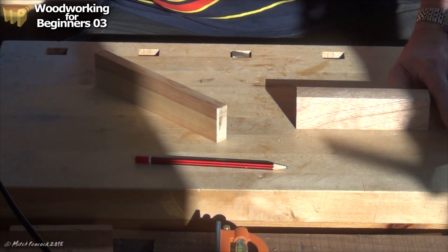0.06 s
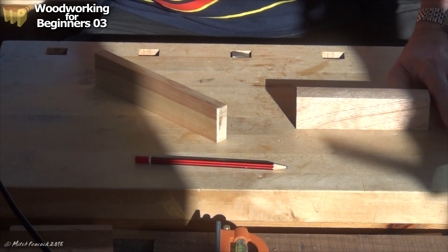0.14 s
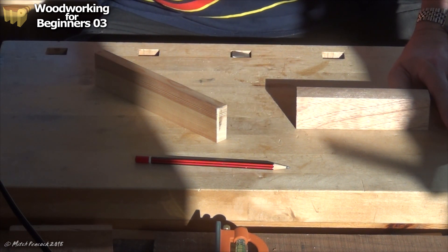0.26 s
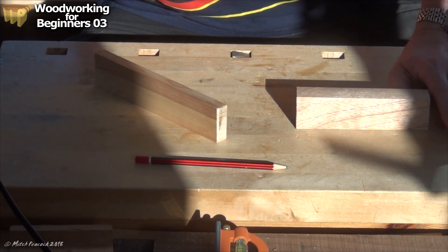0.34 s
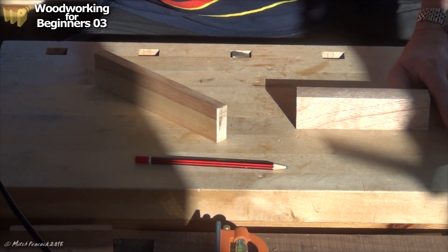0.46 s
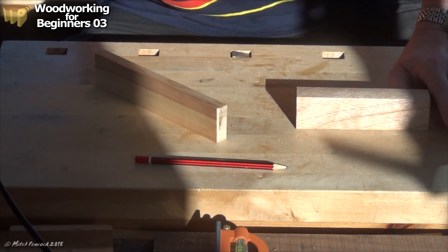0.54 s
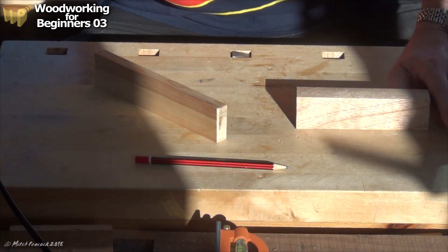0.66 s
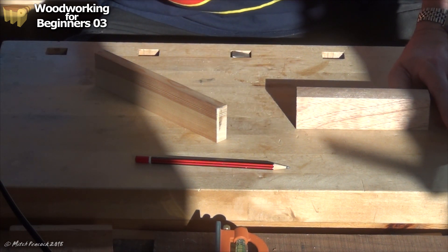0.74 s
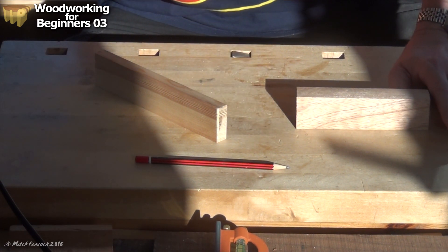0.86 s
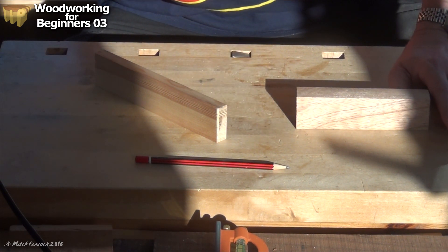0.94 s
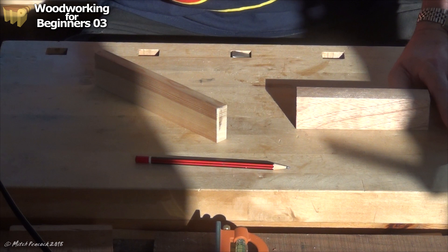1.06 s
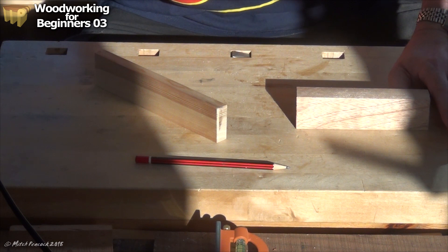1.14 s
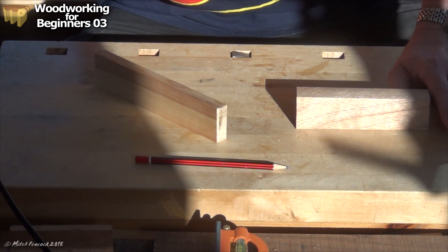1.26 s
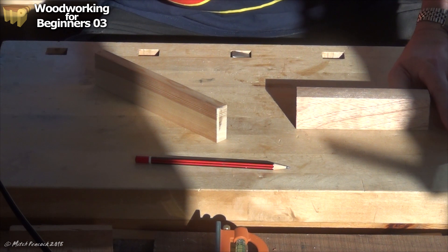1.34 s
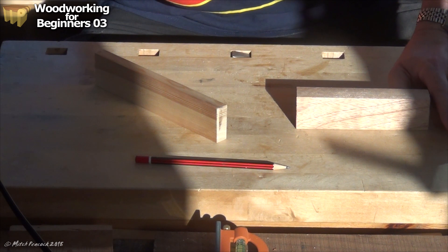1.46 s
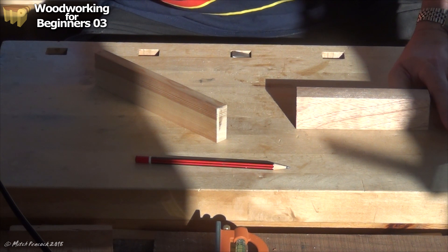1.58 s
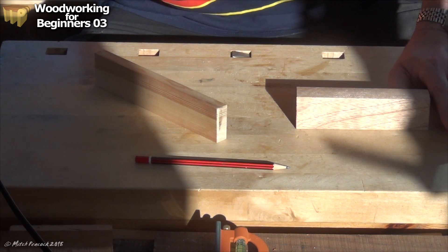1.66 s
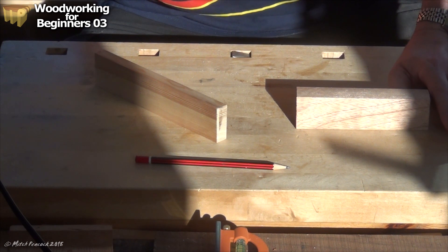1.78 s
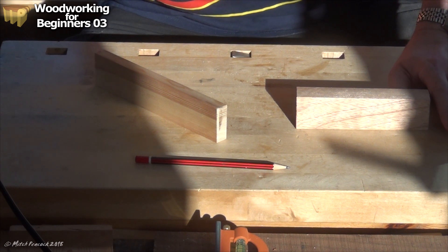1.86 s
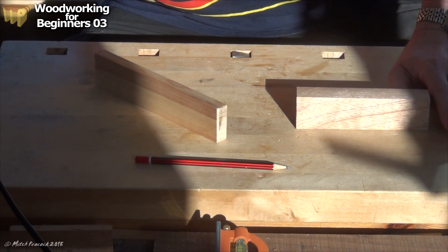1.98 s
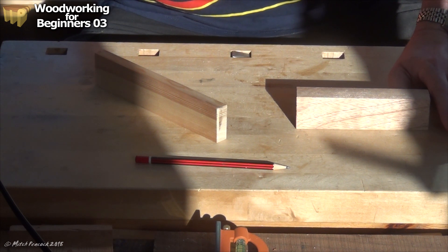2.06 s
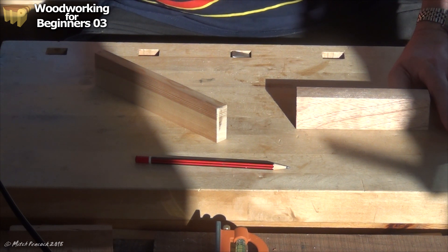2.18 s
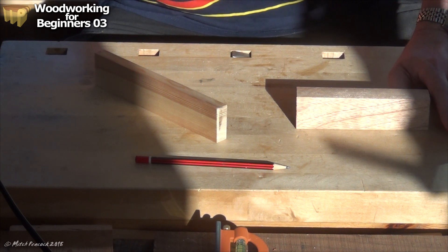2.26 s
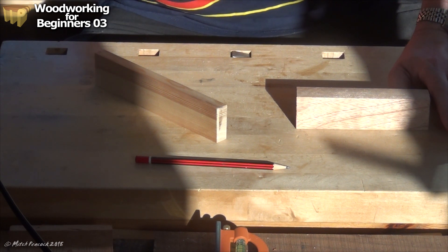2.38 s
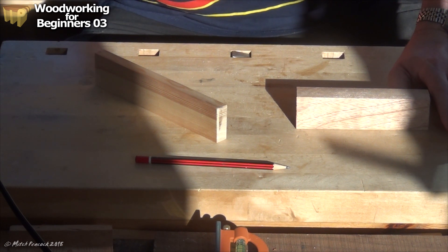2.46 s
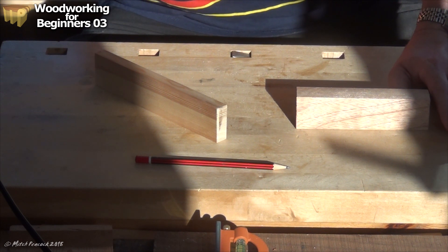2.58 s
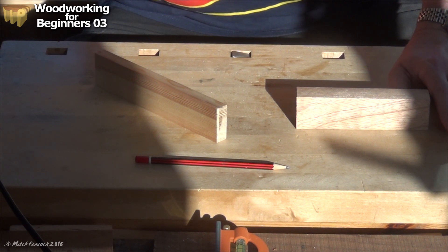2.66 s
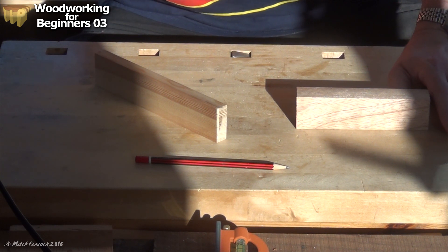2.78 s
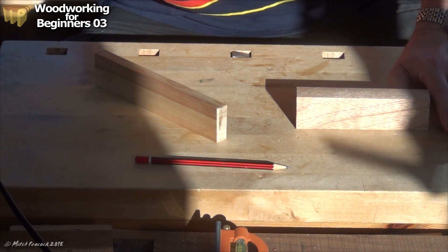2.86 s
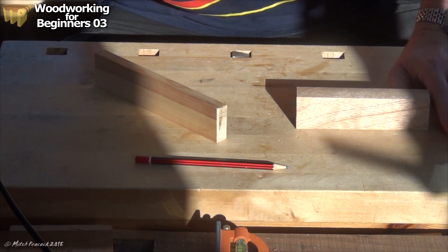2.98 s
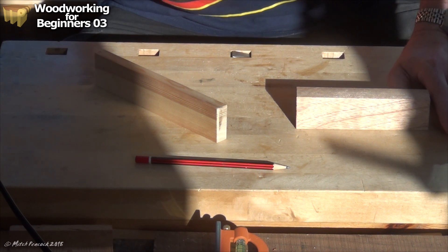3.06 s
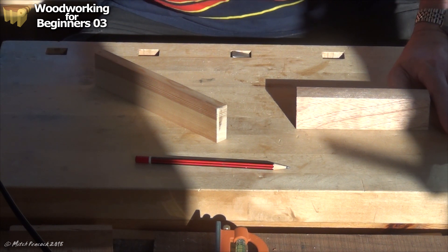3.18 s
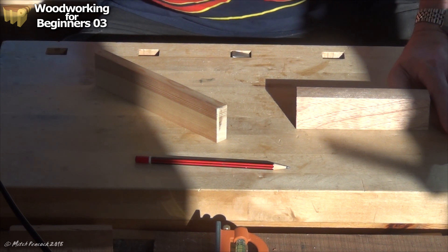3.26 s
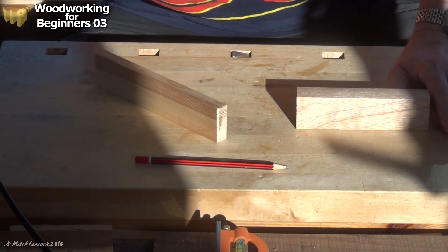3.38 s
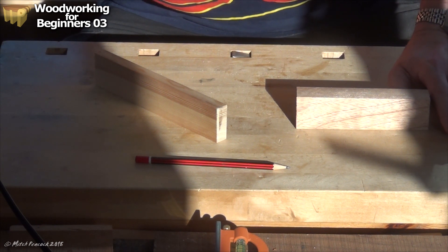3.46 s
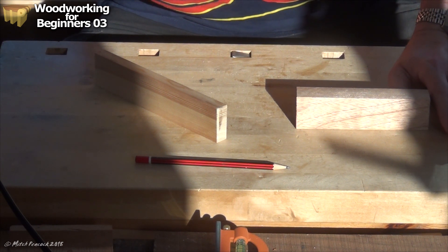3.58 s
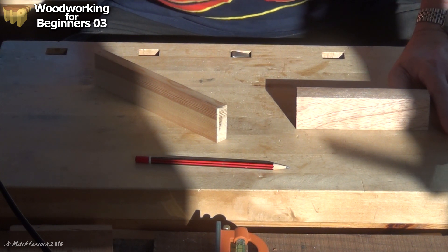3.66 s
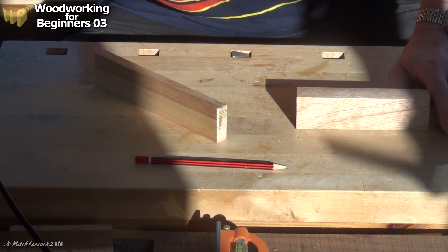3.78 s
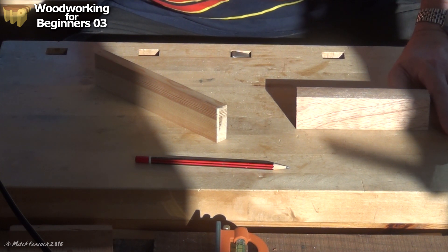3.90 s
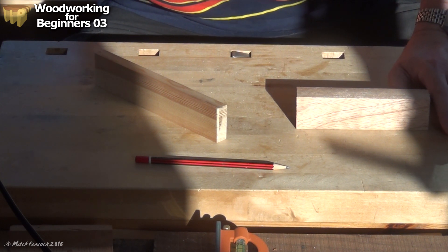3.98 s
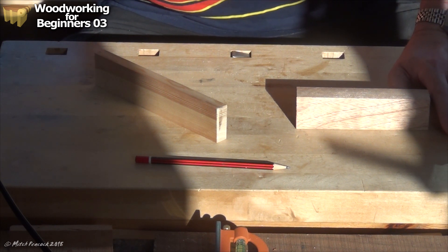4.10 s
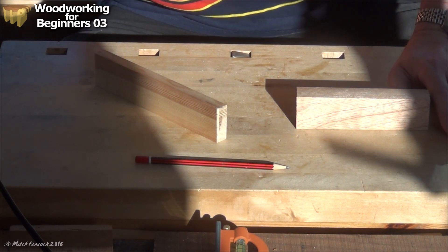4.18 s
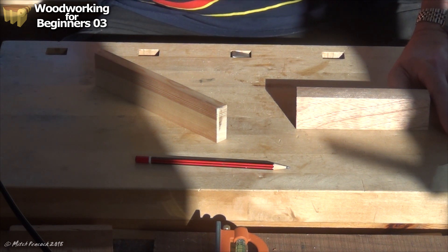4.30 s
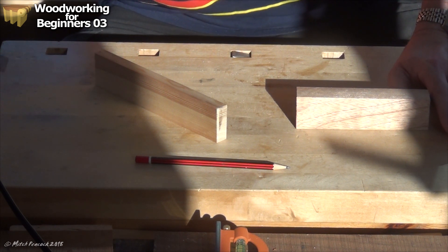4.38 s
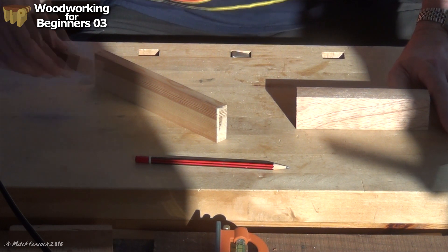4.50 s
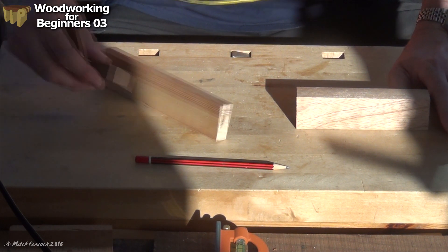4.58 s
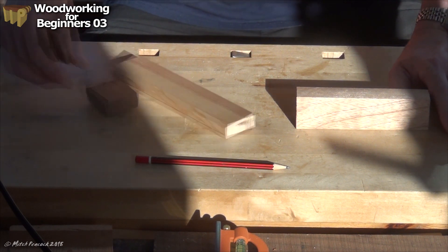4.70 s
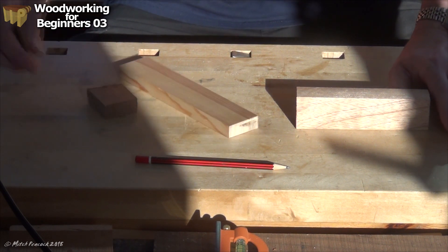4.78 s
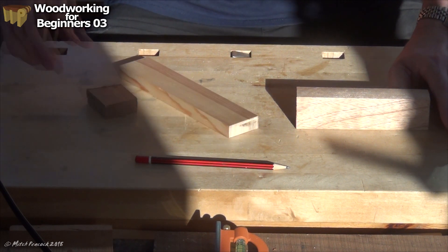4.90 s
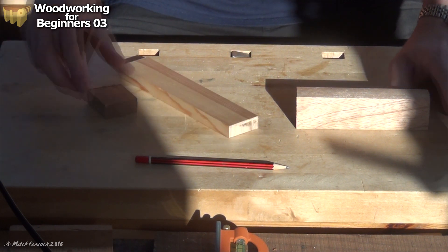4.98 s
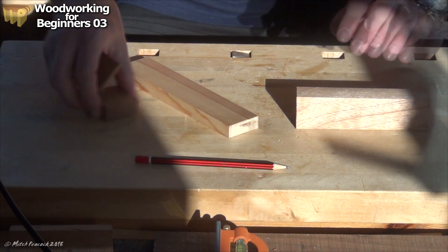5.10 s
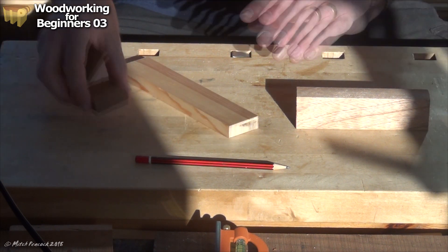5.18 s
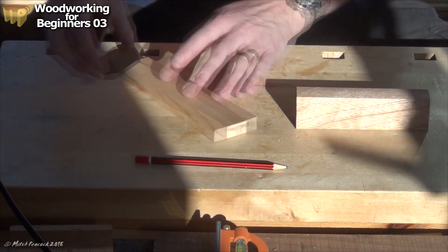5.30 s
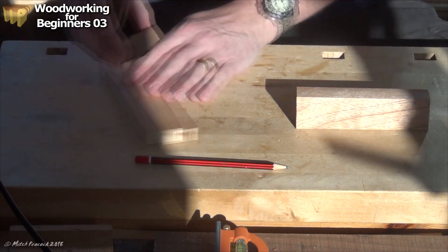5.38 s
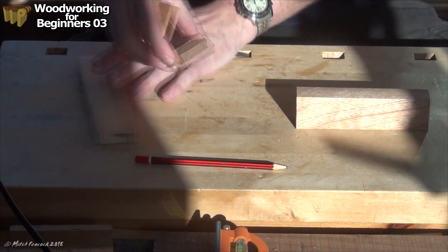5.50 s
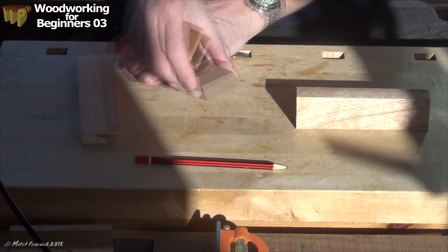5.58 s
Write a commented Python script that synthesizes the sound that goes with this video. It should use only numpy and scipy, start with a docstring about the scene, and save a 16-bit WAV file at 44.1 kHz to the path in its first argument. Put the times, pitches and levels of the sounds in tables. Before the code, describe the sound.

Small wooden offcuts click and rub on a workbench, then a dropped block topples a wooden strip with a loud, clattering slap.

```python
"""Wooden offcuts click and knock over the low hum of a small workshop as someone sorts them.
Wood scrapes on wood and fingers rub over the grain. A small block drops on the bench and bounces into
a standing batten (a strip of wood), which falls flat with a slap; hands then slide the wood away.
Each blow is a click plus the ringing of the wood. The room echoes for half a second, the sound is
nearly mono, and a limiter squeezes the loudest blows."""
import sys
import numpy as np
from scipy import signal
from scipy.fft import rfft, irfft, next_fast_len
from scipy.io import wavfile
from scipy.ndimage import uniform_filter1d

SR = 44100
rng = np.random.default_rng(int(sys.argv[2]) if len(sys.argv) > 2 else 0)


def store_pcm(level_fs):
    """Save levels as 16-bit WAV."""
    pcm = np.round(np.clip(level_fs, -1, 1) * 32767).astype(np.int16)
    wavfile.write(sys.argv[1], SR, np.atleast_2d(pcm).T)


N = 249120
SIZE = 32768  # samples in one blow with its echo
TIME, AGE = np.arange(N) / SR, np.arange(SIZE) / SR  # seconds into the scene, and into one blow
HZ = np.fft.rfftfreq(SIZE, 1 / SR)

# the small block lands and bounces: start_s, relative_db, ring_db, tick_db
BLOCK_BOUNCES = [(4.6275, -2.5, 9, -19), (4.689, -12, -25, -35), (4.7003, -14.5, -30.5, -33.5),
                 (4.7345, -6, -33, -33.5), (4.763, -7.5, -10, -39)]
# the batten falls flat and chatters: start_s, relative_db, ring_db, brightness_db_per_octave
BATTEN_SLAPS = [(4.7776, 10.5, -2.5, 3), (4.787, 6.5, -12, 0), (4.795, 10.5, -10, 1.5), (4.8418, -7, -6, 0),
                (4.848, -6, -1.5, 0), (4.876, -10.5, -13, -1.5)]
# tone colour of a sharp edge's tick: frequency_hz, relative_db
EDGE_COLOUR = [(1000, -11), (3000, 33.5), (5800, 27), (7800, 28), (10000, 9), (16000, 13)]
# how long the room's echo takes to fade by 60 dB: frequency_hz, fade_s
ROOM_FADES = [(100, 0.7), (350, 0.5), (1000, 0.49), (3000, 0.48), (7000, 0.33), (14000, 0.32)]


def amp(db):
    """Turn decibels into a gain."""
    return 10 ** (np.asarray(db) / 20)


def unit_rms(x):
    """Scale to an average power of 1."""
    return x / np.sqrt(np.mean(x ** 2))


def unit_energy(x):
    """Scale to a total energy of 1."""
    return x / np.linalg.norm(x)


def curve_at(points, hz):
    """Read between (frequency_hz, value) points on a log frequency axis."""
    freqs, values = np.transpose(points)
    return np.interp(np.log(np.maximum(hz, freqs[0])), np.log(freqs), values)


def filtered(x, response):
    """Apply a gain that depends on frequency."""
    size = next_fast_len(N + SIZE)
    return irfft(rfft(x, size) * response(np.fft.rfftfreq(size, 1 / SR)), size)[..., :N]


def noise(colour, grain_db=0):
    """Noise of a given tone colour; uneven grain sizes make it gritty."""
    grit = amp(grain_db * unit_rms(uniform_filter1d(rng.standard_normal(N), size=90)))
    return unit_rms(filtered(grit * rng.standard_normal(N), lambda hz: amp(curve_at(colour, hz))))


def pulse(colour, hz=HZ):
    """The shortest click that starts at once and has this tone colour."""
    cepstrum = irfft(np.log(amp(curve_at(colour, hz))))
    cepstrum[1:SIZE // 2] *= 2  # folding packs the energy at the start
    cepstrum[SIZE // 2 + 1:] = 0
    return unit_energy(irfft(np.exp(rfft(cepstrum))))


def ring(modes, free_s=1):
    """A struck piece rings at its own pitches (modes), until a touch chokes it after free_s."""
    tone = 0
    for hz, db, fade_s in modes:
        wave = amp(-60 * AGE / fade_s) * np.sin(2 * np.pi * hz * AGE)
        tone += amp(db + rng.normal(0, 1)) * unit_energy(wave)
    return unit_energy(tone / (1 + (AGE / free_s) ** 10))


def echoes(fades, rise_s):
    """Dense echoes build up, then each frequency fades at its own speed."""
    # tone colour of the echoes: frequency_hz, relative_db
    colour = [(100, -0.5), (350, 1.5), (1000, 0.5), (4000, 0), (15000, 0)]
    hz, t, bands = signal.stft(rng.standard_normal(SIZE), SR, nperseg=256)
    bands *= amp(curve_at(colour, hz)[:, None] - 60 * t / curve_at(fades, hz)[:, None])
    return unit_energy(signal.istft(bands, nperseg=256)[1][:SIZE] * (1 - np.exp(-AGE / rise_s)))


def add(track, start_s, sound):
    """Mix a sound into the track."""
    part = track[max(round(start_s * SR), 0):][:len(sound)]
    part += sound[:len(part)]


def blow(click, tone, bench_db, click_room_db, tone_room_db):
    """A click shakes the bench top; the click and the ringing tone both echo in the room."""
    # how long the bench top shakes: frequency_hz, fade_s
    bench_fades = [(200, 0.21), (1000, 0.19), (4000, 0.038), (12000, 0.11)]
    shake = signal.fftconvolve(click, echoes(bench_fades, rise_s=0.00041))[:SIZE]
    into_room = amp(click_room_db) * click + amp(tone_room_db) * tone
    echo = signal.fftconvolve(into_room, echoes(ROOM_FADES, rise_s=0.0087))[:SIZE]
    return unit_energy(click + amp(bench_db) * shake) + tone + echo


def workshop():
    """The room's low rumble, mains hum and thin, even hiss."""
    # tone colour of the rumble: frequency_hz, relative_db
    rumble_colour = [(12, -47), (20, 2.5), (58, -8), (66, -10), (70, -25), (86, -13), (103, -12.5),
                     (126, -18.5), (288, -24.5), (477, -29.5), (528, -29), (1260, -34.5), (2500, -42),
                     (3250, -75), (5500, -120)]
    # mains hum: pitch_hz, level_db
    mains = [(50, -50.5), (100, -62.5)]
    hum = sum(amp(db) * np.sqrt(2) * np.sin(2 * np.pi * (hz * TIME + rng.random())) for hz, db in mains)
    hiss = noise([(800, -4.5), (2500, -0.5), (6000, -1.5), (10000, -3.0), (15500, -6.5)])
    return amp(-44.5) * noise(rumble_colour) + hum + amp(-57) * hiss


def clack(click, db, fade_s):
    """A small piece's many short-lived modes stretch a click into a clack."""
    modes = unit_energy(rng.standard_normal(SIZE) * amp(-60 * AGE / fade_s))
    return click + amp(db) * signal.fftconvolve(click, modes)[:SIZE]


def offcuts(gain_db=16):
    """Small pieces click high in the hand; large ones knock low and thud on the bench."""
    # pieces picked up and put down, then the swept batten juddering over the bench: start_s, relative_db,
    # pitch_hz, ring_db, tick_db, thud_db, echo_db
    knocks = [(.004, -43, 1280, 2, -30, -25, 7), (.046, -45.5, 503, 8.5, -36, -20, -4),
              (0.531, -20, 2230, 0.5, -4.5, -18, 0), (0.6738, -19, 2280, -11, -4.5, -16, -1.5),
              (0.7015, -13, 1230, -7.5, 1, -21, -7.5), (0.8347, -17, 613, 2.5, -10.5, 2, 2),
              (0.9778, -20.5, 1960, -20, -6, -11, -2), (1.0779, -17.5, 519, 2.5, -9, -7, 2),
              (3.3838, -18.5, 700, -22, -15.5, -7, 1), (3.5803, -5.5, 1192, 1.5, -40, -1, 1),
              (3.5849, -12.5, 1420, -7, -31, -2, -10), (3.997, -14, 330, -27, -27, -1.5, -2.5),
              (5.116, -25, 360, -8, -25, -5, 0), (5.372, -27, 356, -6, -22, -15, 0),
              (5.423, -26.5, 410, -12, -25, -5, 0), (5.499, -28.5, 344, 9, -18, -22, 3.5)]
    # tone colour of a knock: multiple_of_pitch, relative_db
    colour = [(.08, -27), (.28, -8), (.55, -2.5), (1, 2.5), (1.8, -5.5), (2.6, -16.5), (3.5, -19.5),
              (10, -40), (30, -50)]
    # the bench top's thud: pitch_hz, relative_db, fade_s
    bench_modes = [(135.5, -27, 0.104), (224.2, -8.5, 0.42), (378.2, 5, 0.23), (545, 4.5, 0.12),
                   (650.5, -1.5, 0.12), (831, -2.5, 0.26)]
    out = np.zeros(N)
    for start_s, db, pitch_hz, ring_db, tick_db, thud_db, echo_db in knocks:
        contact = pulse(colour, HZ / pitch_hz) + amp(tick_db) * pulse(EDGE_COLOUR)
        click = amp(-1.5) * clack(contact, db=-3.5, fade_s=0.018)
        # a sharp edge wakes the higher modes
        modes = [(pitch_hz, 0, .15), (2.63 * pitch_hz, tick_db - 2, .04),
                 (3.42 * pitch_hz, tick_db - 5.5, .025)]
        tone = amp(ring_db) * ring(modes, free_s=0.023) + amp(thud_db) * ring(bench_modes)
        knock = blow(click, tone, bench_db=echo_db + 2, click_room_db=echo_db, tone_room_db=echo_db - 9.5)
        add(out, start_s, amp(db + gain_db) * knock)
    return out


def stroke(start_s, length_s, rise_s, fall_db_per_s):
    """Loudness of one hand movement: it gathers speed, holds, and dies away once the hand stops."""
    age = TIME - start_s
    speed = np.sin(np.pi / 2 * np.clip(age / rise_s, 0, 1)) ** 2
    return speed * amp(-fall_db_per_s * np.maximum(age - length_s, 0))


def fibres(x, patchy_db):
    """Each stroke meets other wood fibres, so narrow frequency bands swell and fade by turns."""
    bands = signal.stft(x, nperseg=512)[2]
    patches = rng.standard_normal(bands.shape)
    for _ in range(2):
        patches = uniform_filter1d(uniform_filter1d(patches, size=5, axis=0), size=14, axis=1)
    return unit_rms(signal.istft(bands * amp(patchy_db * unit_rms(patches)), nperseg=512)[1][:N])


def scrapes():
    """Wood rasps on wood as a piece is turned or shifted."""
    # brief grazes: start_s, length_s, relative_db
    grazes = [(0.503, .02, -48.5), (0.65, 0.06, -39.5), (0.93, 0.095, -37.5), (1.087, 0.031, -39),
              (3.421, 0.1, -39.5), (4.016, 0.075, -44.5), (4.26, .025, -59.5), (5.095, 0.029, -38),
              (5.27, .02, -59), (5.356, 0.17, -41)]
    # tone colour of the rasp: frequency_hz, relative_db
    colour = [(1180, -7), (2000, -4), (3460, -10), (3940, -6), (4860, -9.5), (7640, -6.5), (10500, -14),
              (11900, -12), (16000, -20)]
    loudness = sum(amp(db) * stroke(start_s, length_s, rise_s=0.022, fall_db_per_s=172)
                   for start_s, length_s, db in grazes)
    return amp(-0.5) * loudness * fibres(noise(colour, grain_db=1.5), patchy_db=3)


def fingers():
    """Fingers hiss over the grain and wake two faint whistles in the wood by turns."""
    # finger strokes: start_s, length_s, level_db, lower_whistle_db, upper_whistle_db
    rubs = [(1.166, 0.1, -43, -12, -28), (1.389, 0.08, -42.5, -15, -11), (1.569, 0.067, -46.5, -12, -16),
            (1.769, 0.15, -51, -18, -16), (1.993, 0.19, -54.5, -13, -6), (2.268, .08, -51.5, -21, 3.5),
            (2.398, 0.093, -45, -15, -12), (2.51, 0.07, -47, -5, -27), (2.674, 0.066, -48.5, -7, -17),
            (2.845, 0.086, -42.5, -5.5, -15), (3.24, 0.084, -54.5, -3, -14)]
    # tone colour of skin on wood: frequency_hz, relative_db
    colour = [(1180, -45), (2000, -21), (2620, -7), (3400, -13.5), (3980, -9.5), (4570, -11.5), (5680, -3),
              (6420, 0), (7770, 1), (9740, -8), (10800, -5.5), (14400, -3.5), (16000, -41)]
    # resonances of the rubbed piece: pitch_hz, width_hz, relative_db
    resonances = [(5770, 260, 1.5), (8580, 570, 0)]
    skin = fibres(noise(colour, grain_db=2), patchy_db=2.5)
    whistles = []
    for pitch_hz, width_hz, db in resonances:
        band = filtered(rng.standard_normal(N), lambda hz: 1 / (1 + (2 * (hz - pitch_hz) / width_hz) ** 2))
        whistles.append(amp(db) * unit_rms(band))
    out = np.zeros(N)
    for start_s, length_s, db, lower_db, upper_db in rubs:
        hiss = skin + amp(lower_db) * whistles[0] + amp(upper_db) * whistles[1]
        out += amp(db) * stroke(start_s, length_s, rise_s=0.056, fall_db_per_s=158) * hiss
    return out


def slides():
    """Wood rumbles over the bench: an offcut is nudged, and later the batten is swept away."""
    # the two pushes: start_s, length_s, level_db
    nudge = (3.41, 0.12, -33.5)
    sweep = (5.36, .11, -28)
    # their tone colours: frequency_hz, relative_db
    nudge_colour = [(88, -44), (150, -18), (195, -14), (238, 5.5), (504, -11), (575, 6), (683, -7),
                    (729, -1), (3500, -23), (4550, -54), (7700, -120)]
    sweep_colour = [(88, -50.5), (150, -21), (171, -27), (211, -4), (294, -27), (326, 1), (387, 6.5),
                    (546, -20), (854, -8), (937, -33), (1170, -17.5), (3500, -59), (4550, -69),
                    (7700, -120)]
    light = stroke(*nudge[:2], rise_s=0.095, fall_db_per_s=150) * noise(nudge_colour, grain_db=-1)
    heavy = stroke(*sweep[:2], rise_s=0.025, fall_db_per_s=121) * noise(sweep_colour, grain_db=1.5)
    return amp(nudge[2]) * light + amp(sweep[2]) * heavy


def block(gain_db=17):
    """The dropped block rings briefly on its first hop and clacks dully afterwards."""
    # tone colour of a landing: frequency_hz, relative_db
    colour = [(80, -29), (220, -1), (380, 7), (700, 1), (1100, 1), (1800, 4.5), (2500, -5), (3500, -9.5),
              (8000, -22.5), (15000, -31.5)]
    # the block's ringing: pitch_hz, relative_db, fade_s
    modes = [(2137, 0, .25), (4070, -29, .08), (4420, -18, .05), (6690, -30, .08), (7620, -37, .12),
             (9600, -34, .04)]
    # high chinks as a corner catches: start_s, level_db
    chinks = [(4.7345, -12), (4.7627, -7), (4.773, -16)]
    out = np.zeros(N)
    for start_s, db, ring_db, tick_db in BLOCK_BOUNCES:
        click = pulse(colour) + amp(tick_db) * pulse(EDGE_COLOUR)
        tone = amp(ring_db) * ring(modes, free_s=0.018)
        bounce = blow(click, tone, bench_db=5, click_room_db=-6.5, tone_room_db=-10.5)
        add(out, start_s, amp(db + gain_db) * bounce)
    for start_s, db in chinks:
        chink = ring([(8900, 0, 0.0084), (9200, -7, 0.02)])
        echo = signal.fftconvolve(chink, echoes(ROOM_FADES, rise_s=.01))[:SIZE]
        add(out, start_s, amp(db) * (chink + amp(-11) * echo))
    return out


def high_ringing(landing_db=3, slap_db=21):
    """A thin, high ringing lingers after the block's first landing and the batten's first slap."""
    # the lingering tones: pitch_hz, relative_db, fade_s
    modes = [(4334, 0, 0.55), (4510, -5, .4), (6705, -5, 0.45), (6736, -7, 0.45), (7722, -7, 0.4)]
    out = np.zeros(N)
    add(out, BLOCK_BOUNCES[0][0], amp(landing_db) * ring(modes[:2]))
    add(out, BATTEN_SLAPS[0][0], amp(slap_db) * ring(modes))
    return out


def batten(gain_db=19):
    """The batten's flat face hits the bench: a bright slap, then duller rebounds."""
    # tone colour of a slap: frequency_hz, relative_db
    colour = [(80, -22.5), (200, 1.5), (350, 8), (700, 5), (1500, 4.5), (3000, 4.5), (4500, 9), (7500, 2.5),
              (10000, -5.5), (12500, -22), (16000, -37)]
    # the batten's ringing: pitch_hz, relative_db, fade_s
    modes = [(329.6, -12, 0.23), (439, -9.5, 0.15), (1725, -6.5, 0.17), (2120, -11, 0.21),
             (2680, -13, 0.18), (3135, -7, 0.19), (4420, -1, 0.035), (5530, -14, .04), (6670, 4, .035),
             (7600, 5.5, 0.035)]
    out = np.zeros(N)
    for start_s, db, ring_db, brightness in BATTEN_SLAPS:
        click = pulse([(hz, band_db + brightness * np.log2(hz)) for hz, band_db in colour])
        slap = blow(click, amp(ring_db) * ring(modes), bench_db=12, click_room_db=-3.5, tone_room_db=-2)
        add(out, start_s, amp(db + gain_db) * slap)
    return out


def scene():
    """Every sound reaches both channels alike."""
    mono = offcuts() + block() + batten() + high_ringing() + fingers() + scrapes() + slides() + workshop()
    return np.tile(mono, (2, 1))


def limiter(x, threshold_db=-7, release_db_per_s=130, attack_s=0.0006):
    """The volume drops quickly on a loud blow and creeps back while the echo dies away."""
    power = np.abs(uniform_filter1d(np.mean(x ** 2, axis=0), size=64))
    excess_db = np.maximum(10 * np.log10(power + 1e-12) - threshold_db, 0)
    recovery_db = release_db_per_s * TIME
    cut_db = np.maximum.accumulate(excess_db + recovery_db) - recovery_db
    smoothing = np.exp(-1 / (attack_s * SR))
    return x * amp(-signal.lfilter([1 - smoothing], [1, -smoothing], cut_db))


def record(dry, top_hz=16050):
    """Loud blows are limited and clipped, faint stereo hiss and rumble is added, the top treble is cut."""
    stray = amp(-75.5) * noise([(25, -2), (60, -19), (200, -18), (1000, -30.5), (6000, -33), (13000, -24)])
    clipped = np.clip(limiter(dry) + np.array([stray, -stray]), -1, 1)
    return filtered(clipped, lambda hz: hz < top_hz)


dry = scene()
out = record(dry)
store_pcm(out)
```